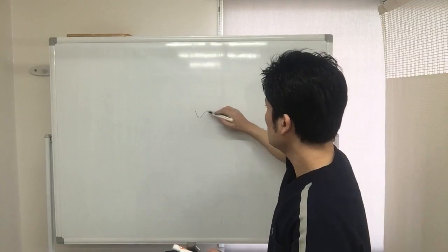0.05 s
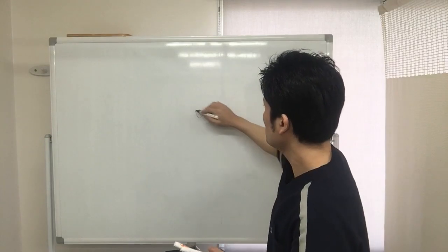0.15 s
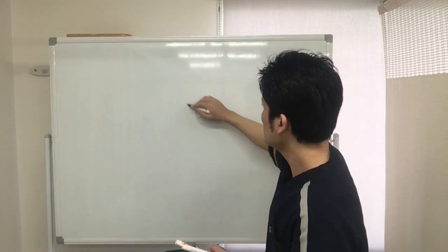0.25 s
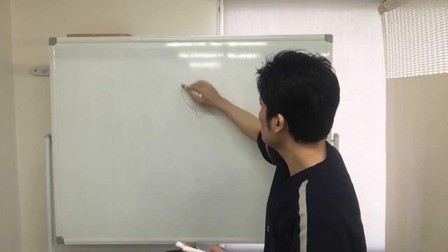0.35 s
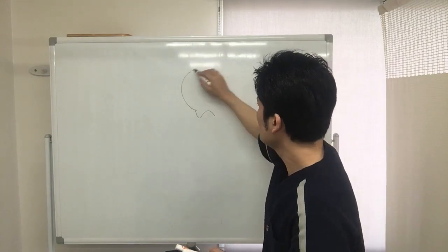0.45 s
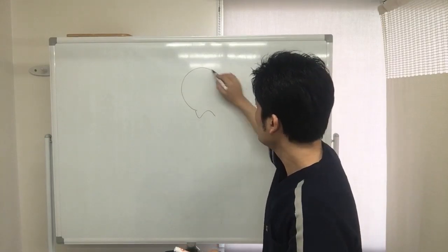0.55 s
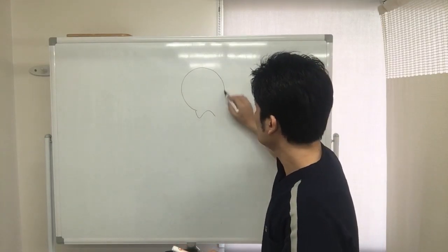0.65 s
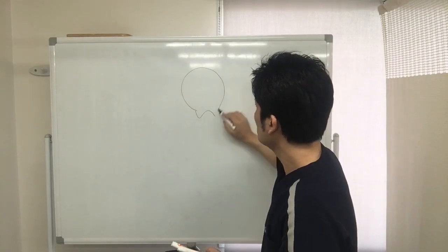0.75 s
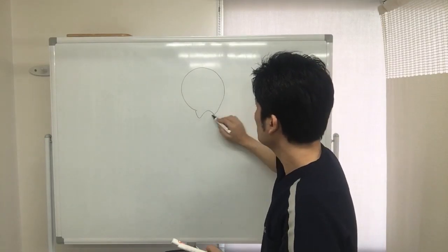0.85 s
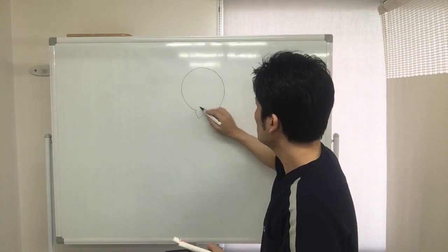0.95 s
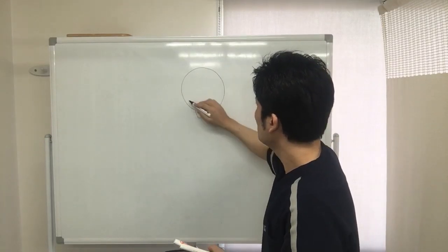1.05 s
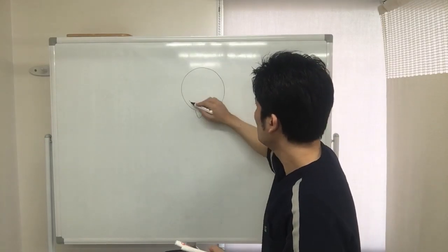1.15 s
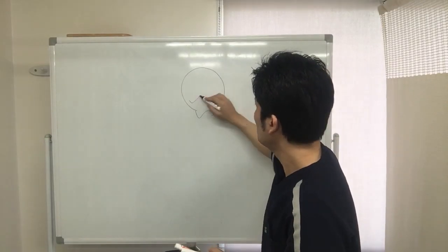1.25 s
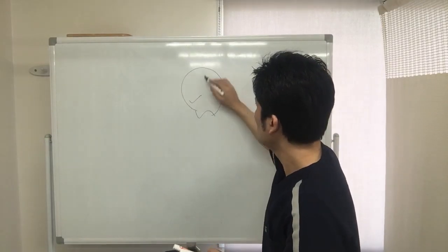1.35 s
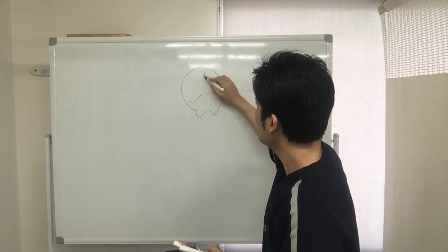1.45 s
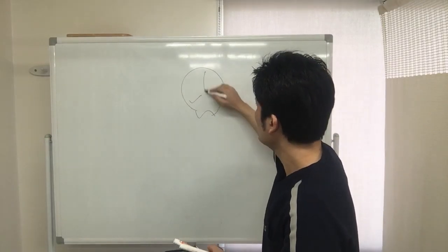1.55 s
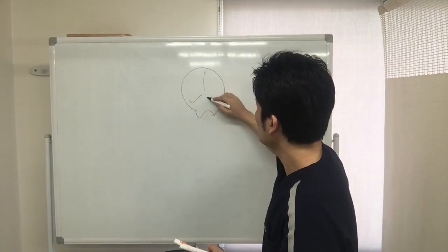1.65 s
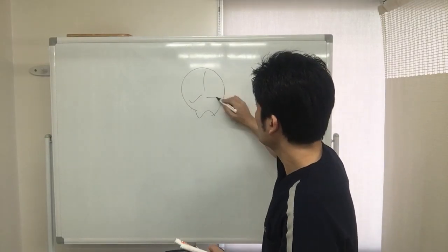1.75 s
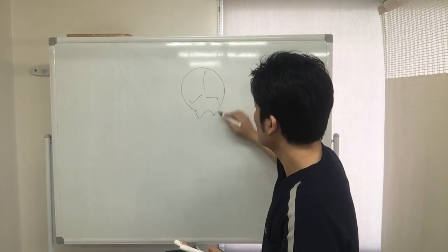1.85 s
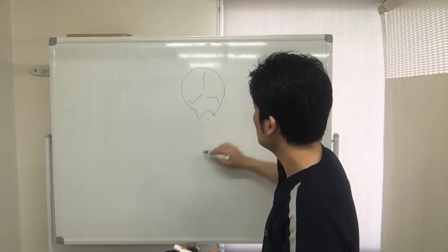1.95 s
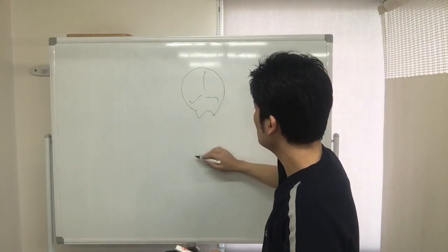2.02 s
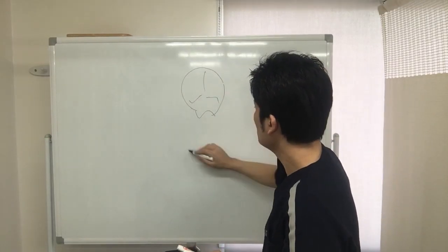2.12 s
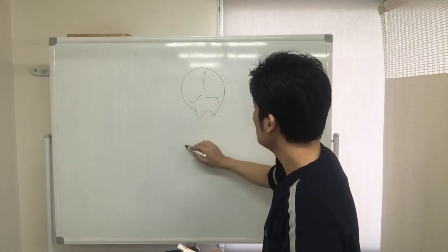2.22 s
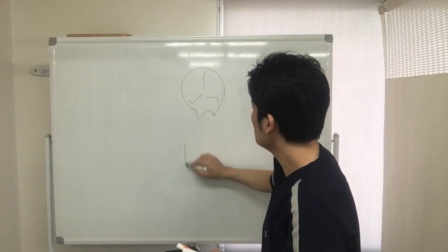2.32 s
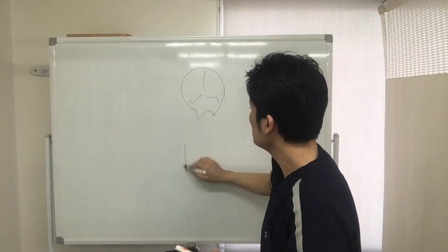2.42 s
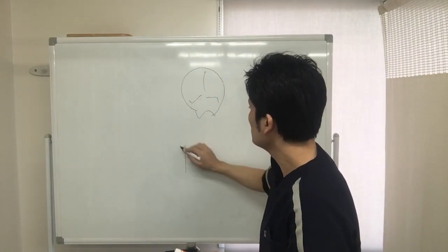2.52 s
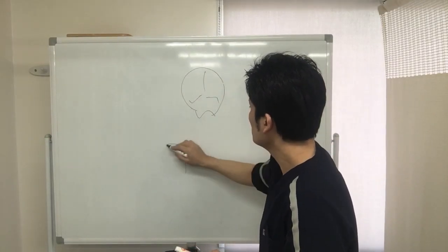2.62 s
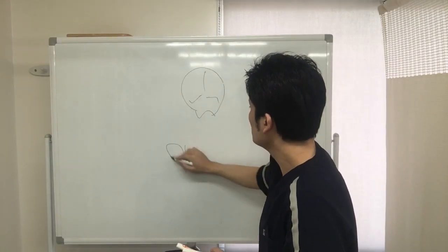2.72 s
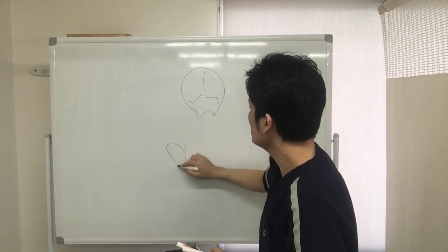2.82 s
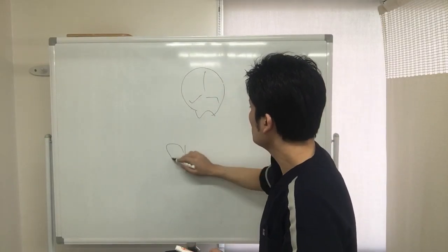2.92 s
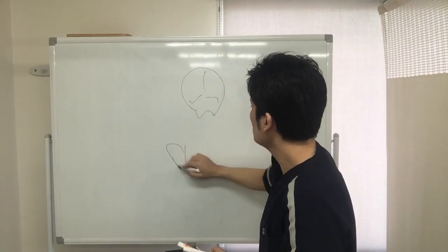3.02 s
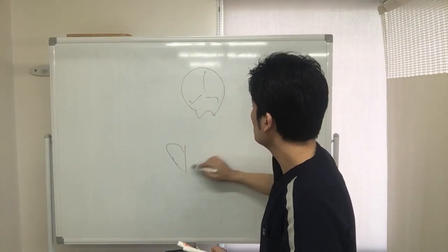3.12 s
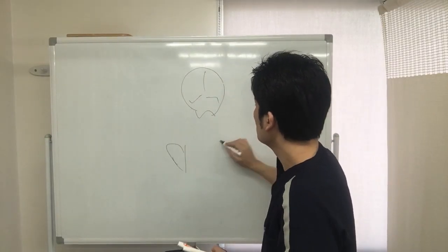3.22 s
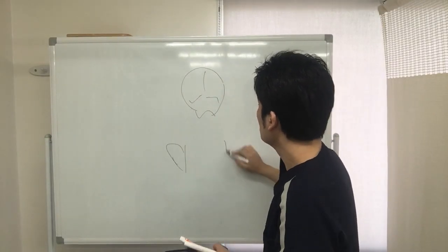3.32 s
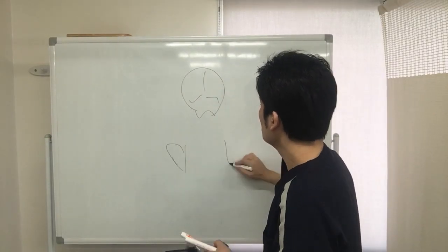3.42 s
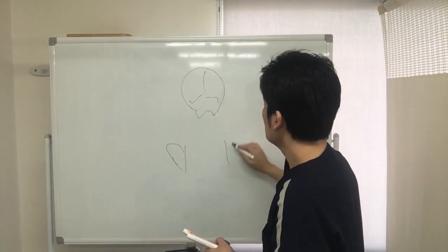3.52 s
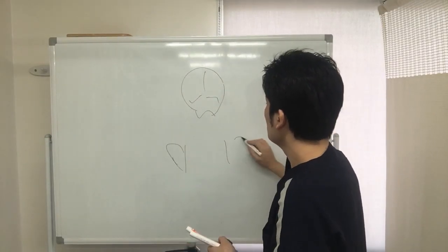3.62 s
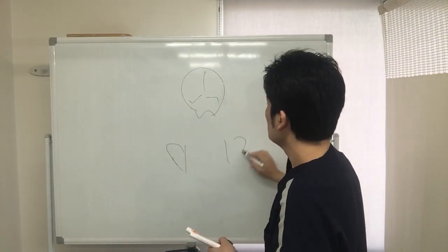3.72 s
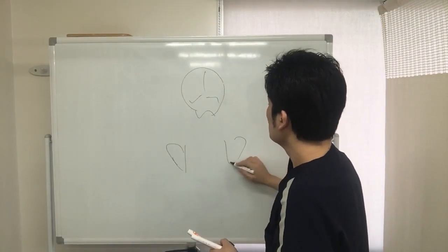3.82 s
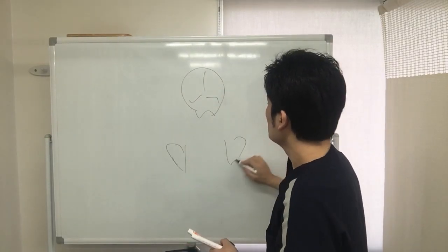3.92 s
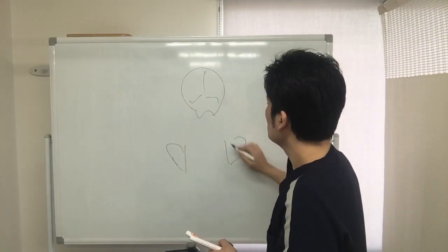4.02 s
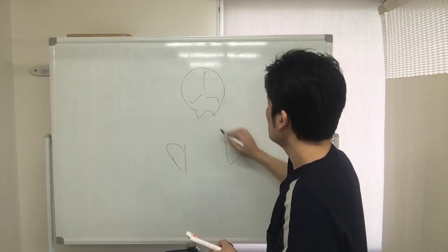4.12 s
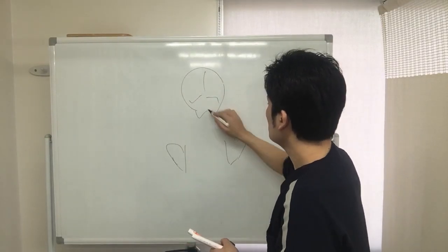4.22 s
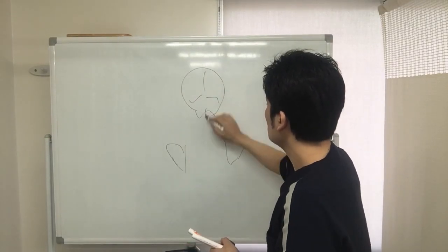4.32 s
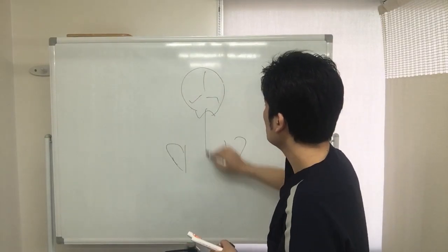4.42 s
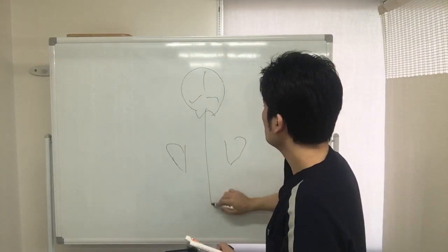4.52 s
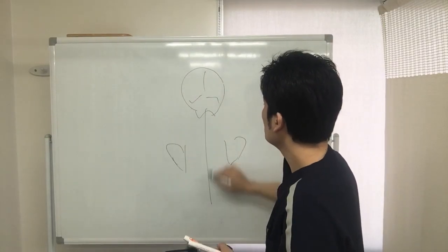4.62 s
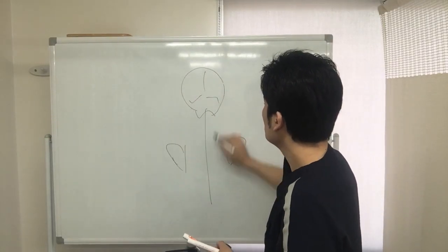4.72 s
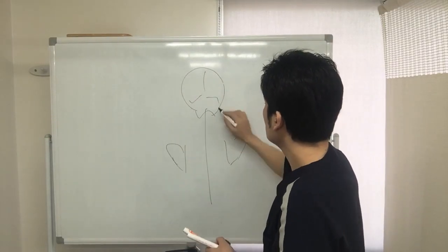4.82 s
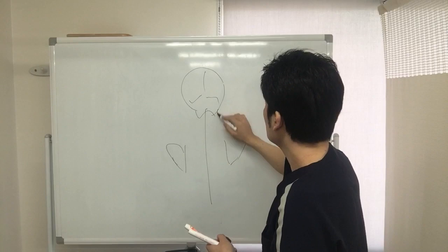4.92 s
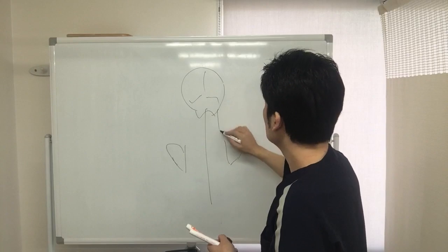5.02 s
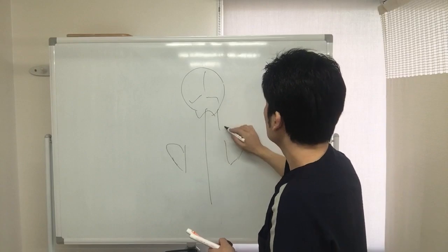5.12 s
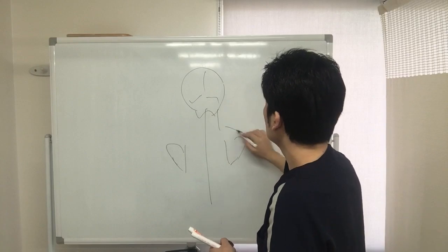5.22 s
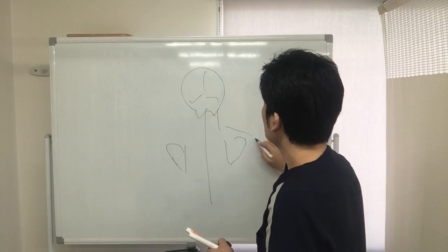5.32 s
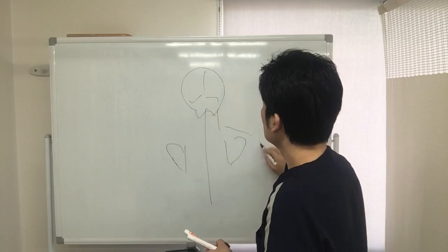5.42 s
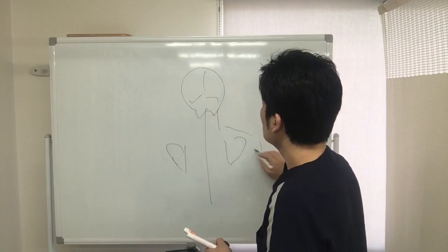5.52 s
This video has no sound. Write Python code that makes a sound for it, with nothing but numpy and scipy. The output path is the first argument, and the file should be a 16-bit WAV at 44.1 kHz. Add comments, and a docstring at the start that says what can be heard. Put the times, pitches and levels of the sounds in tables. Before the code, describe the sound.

A quiet small room with steady low mains hum, soft ventilation rumble and very faint whines. At 0.2 s a felt marker lands on a whiteboard with a firm hollow thump, a tick and a squeak, then hisses softly along a curve until about 0.85, slowing to a dull rub until 1.0. Lighter taps at 1.1, 1.45 and 1.6 carry short strokes; those at 1.85 and 2.1 are barely audible. Taps at 2.2, 2.5 and 2.95 get firmer, with short swishes and a squeak at 2.9. A quick bright swish follows the tap at 3.3; strong knocks at 3.6 and 3.9 come with slow, dull rubs and small squeaks. The hard tap at 4.3 starts a longer hissing line to 4.6. Firm knocks at 4.9 and 5.2 bring short strokes and a squeak at 5.1, then a softer tap at 5.4. Board resonances die quickly, with a close wall reflection and short room tail.

```python
"""A felt marker draws on a free-standing whiteboard in a small room, a wall close behind the board.
Each touch-down thumps the panel, which rings differently high up and lower down; firm, hard landings
also tick in the barrel. Each line is one swing of the hand: filtered noise rubs dully when slow and
hisses when fast. Short wavering tones with rough noise squeak now and then.
Mains hum, faint whines and ventilation noise lie beneath."""
import sys
import numpy as np
from scipy import signal
from scipy.fft import rfft, irfft
from scipy.io import wavfile

SR = 44100
rng = np.random.default_rng(int(sys.argv[2]) if len(sys.argv) > 2 else 0)


def bounce(signal):
    """Save signal as a 16-bit WAV file at the path given by the first command-line argument."""
    frames = np.transpose(np.atleast_2d(signal))
    limited = np.clip(frames, -1, 1)
    pcm = np.round(limited * 32767).astype(np.int16)
    wavfile.write(sys.argv[1], SR, pcm)


N = 245195  # samples, about 5.56 s


def amp(db):
    """Decibels to gain."""
    return 10 ** (np.asarray(db) / 20)


def unit(x):
    """Scales to rms 1."""
    return x / np.sqrt(np.mean(x ** 2) + 1e-20)


def read(points, hz):
    """Reads a table of (frequency [Hz], value) on a log-frequency axis."""
    f, value = np.transpose(points)
    return np.interp(np.log(hz + 1), np.log(f + 1), value)


def add(mix, s, sound):
    """Mixes a sound in at time s, cut off at the ends of the mix."""
    start = round(s * SR)
    sound = sound[max(-start, 0):]
    part = mix[max(start, 0):][:len(sound)]
    part += sound[:len(part)]


def colour(x, points, tilt_db=0):
    """Filters x by a table of relative levels, tilted by some dB per octave, to rms 1."""
    hz = np.fft.rfftfreq(len(x), 1 / SR)
    gain = amp(read(points, hz) + tilt_db * np.log2(hz + 1))
    return unit(irfft(rfft(x) * gain, len(x)))


def band(x, low_hz, high_hz, order=2):
    """Causal band-pass."""
    sections = signal.butter(order, [low_hz, high_hz], "band", fs=SR, output="sos")
    return signal.sosfilt(sections, x)


def drift(size, rate):
    """Smooth random wander of rms 1, its spectrum fading out around rate [Hz]."""
    hz = np.fft.rfftfreq(size, 1 / SR)
    smooth = np.exp(-(hz / rate) ** 2) * (hz > 0)
    return unit(irfft(rfft(rng.standard_normal(size)) * smooth, size))


def die_away(x, t60):
    """Lets each frequency of x decay at its own speed."""
    hz, t, z = signal.stft(x, SR, nperseg=256)
    decay = amp(-60 * t / read(t60, hz)[:, None])
    return signal.istft(z * decay, SR)[1][:len(x)]


def background(waver_db=0.8, wander_rad=0.39):
    """Hum and whines as sines of slightly wavering level and phase; ventilation as two filtered noises."""
    # mains and fan hum, faint whines: (frequency [Hz], mean level [dB])
    hum_lines = [(97.5, -72.5), (119.9, -58.5), (651, -88), (3400, -88.5), (3764, -108)]
    # low ventilation rumble: (frequency [Hz], relative level [dB per Hz])
    rumble_spectrum = [(12, -38), (27, -11), (39, 5), (52, -4.5), (80, -2), (100, -3.5), (135, -1),
                       (175, -5), (250, -10), (350, -32.5), (600, -42), (2000, -82)]
    # thin ventilation hiss: (frequency [Hz], relative level [dB per Hz])
    hiss_spectrum = [(210, -15.5), (350, 2.5), (437, -9), (537, -4.5), (600, -5), (798, -6.5), (892, -6.5),
                     (1050, -6), (2710, -10), (2980, -10), (5530, -16), (6180, -15), (7960, -21.5),
                     (9480, -22), (15500, -32.5)]
    rumble_db, hiss_db = -58.5, -67
    t = np.arange(N) / SR
    hum = np.zeros(N)
    for hz, db in hum_lines:
        level = amp(db + waver_db * drift(N, 1.5))
        hum += level * unit(np.sin(2 * np.pi * hz * t + wander_rad * drift(N, 14)))
    rumble = amp(rumble_db) * colour(rng.standard_normal(N), rumble_spectrum)
    hiss = amp(hiss_db) * colour(rng.standard_normal(N), hiss_spectrum)
    return hum + rumble + hiss


def echo(x, db, wall_s=.0051):
    """The wall just behind the board answers once."""
    out = x.copy()
    add(out, wall_s, amp(db) * x)
    return out


def room(x, wall_db, wet_db, build_s=0.0026):
    """The wall's echo, plus a short diffuse tail of decaying noise."""
    # reverberation of the small room: (frequency [Hz], decay time t60 [s])
    tail_t60 = [(150, 0.28), (500, 0.26), (1500, 0.28), (4000, 0.2), (10000, 0.26)]
    t = np.arange(SR // 2) / SR
    tail = die_away(rng.standard_normal(len(t)), tail_t60) * (1 - np.exp(-t / build_s))
    tail /= np.linalg.norm(tail)
    return echo(x, wall_db) + amp(wet_db) * signal.fftconvolve(x, tail)[:len(x)]


def squeaks(waver=0.05, waver_rate=500, flutter_db=3, tone_db=-5, scrape_db=-3, linger_db=-13, linger_s=0.15):
    """The tip sticks and slips near the barrel's resonance: a quick burst, then a faint lingering chatter."""
    # squeaks of the tip: (start [s], level before the room [dB], mean pitch [Hz])
    squeak_list = [(0.172, -54, 3600), (1.401, -61.5, 3450), (1.595, -66, 3550), (1.808, -70, 3380),
                   (2.080, -67.5, 3550), (2.923, -58.5, 3680), (3.635, -60.5, 3540), (3.775, -62, 3620),
                   (4.171, -68, 3630), (5.105, -60.5, 3730)]
    # rough part of a squeak, centred on the barrel's resonance: (frequency [Hz], relative level [dB per Hz])
    scrape_spectrum = [(300, -28), (1400, -13.5), (2600, -18), (3100, -9), (3550, 3.5), (4200, -6.5),
                       (4900, -13), (6200, -24), (7300, -11.5), (8500, -37), (16000, -50)]
    rise_s = 0.0091
    out, t = np.zeros(N), np.arange(SR // 4) / SR
    rise = t / rise_s
    burst = (rise * np.exp(1 - rise)) ** 2
    linger = amp(linger_db) * np.minimum(rise, 1) * np.exp(-t / linger_s)
    grip = burst + linger
    for s, db, hz in squeak_list:
        pitch = hz * (1 + waver * drift(len(t), waver_rate))
        tone = unit(np.sin(2 * np.pi * np.cumsum(pitch) / SR))
        scrape = colour(rng.standard_normal(len(t)), scrape_spectrum)
        chatter = unit(amp(flutter_db * np.tanh(drift(len(t), 300))))
        add(out, s, amp(db) * grip * chatter * (amp(tone_db) * tone + amp(scrape_db) * scrape))
    return out


def swing(size, peak_share=0.34):
    """Speed of the hand along one line, 0 to 1: it gathers pace, peaks after peak_share and slows to a stop."""
    angle = np.interp(np.linspace(0, 1, size), [0, peak_share, 1], [0, np.pi / 2, np.pi])
    return np.sin(angle)


def rubbing(grain_db=2.0, grain_rate=250, uneven_db=2.5, uneven_rate=25):
    """Felt fibres catch and slip: a dull rub that hardly follows speed, and a bright swish that grows with it."""
    # swings of the hand: (start [s], length [s], relative top speed [dB], pressure as added level [dB])
    stroke_list = [(0.191, .66, 1.5, -1.5), (0.761, .27, -21, 7), (1.17, 0.14, -1, -4.5),
                   (1.49, 0.26, -5.5, 1.5), (1.765, .13, -13, 5.5), (1.993, 0.16, -7, 1),
                   (2.282, .12, 4.5, -3.5), (2.528, 0.14, -4, -1.5), (2.727, .10, -1, -1),
                   (2.998, 0.063, 7, -5), (3.332, .09, 10.5, -7.5), (3.599, 0.18, -19, 4.5),
                   (3.942, .15, -21, 5.5), (4.339, 0.26, 4, -2), (4.944, 0.085, 2, -2.5),
                   (5.192, 0.13, 0.5, -1.5)]
    # felt on enamel with the marker's resonances, before tilt: (frequency [Hz], relative level [dB per Hz])
    felt_spectrum = [(100, -49), (300, -13), (800, -8.5), (1400, 4.5), (2300, -0.5), (3650, 3.5), (4800, 3),
                     (5600, 0.5), (6050, 3), (6550, -6.5), (7250, -0.5), (8300, -11.5), (11000, -22),
                     (16000, -28)]
    # level [dB], tilt [dB per octave], power of the speed that the level follows
    rub_db, rub_tilt_db, rub_power = -75.5, -6, 0.1
    swish_db, swish_tilt_db, swish_power = -72.5, 6, 0.87
    out = np.zeros(N)
    for start, length, speed_db, pressure_db in stroke_list:
        size = round(length * SR)
        speed = amp(speed_db) * swing(size)
        roughness_db = grain_db * drift(size, grain_rate) + uneven_db * drift(size, uneven_rate)
        slips = rng.standard_normal(size) * amp(roughness_db)
        rub = colour(slips, felt_spectrum, rub_tilt_db)
        swish = band(colour(slips, felt_spectrum, swish_tilt_db), 1500, 10000)
        add(out, start, amp(rub_db + pressure_db) * speed ** rub_power * rub)
        add(out, start, amp(swish_db + pressure_db) * speed ** swish_power * swish)
    return out


def ring(t, hz, db, t60):
    """One struck mode: a sine that decays by 60 dB in t60 [s]."""
    return amp(db) * np.exp(-np.log(1000) * t / t60) * np.sin(2 * np.pi * hz * t)


def harden(x, tilt_db, knee_hz=330, top_hz=5000):
    """A harder, shorter contact lifts the sound from knee to top, a softer one dulls it; minimum phase."""
    hz = abs(np.fft.fftfreq(len(x), 1 / SR))
    octaves = np.log2(np.hypot(1, hz / knee_hz) / np.hypot(1, hz / top_hz))
    log_gain = np.log(amp(tilt_db * octaves))
    # the Hilbert transform of the log gain gives the phase of a causal filter
    return np.fft.ifft(np.fft.fft(x) * np.exp(np.conj(signal.hilbert(log_gain)))).real


def taps(panel_db=-42, swell_s=0.011, spread_s=0.00079, lag_s=0.00094):
    """The tip lands: the barrel ticks, the panel gives, bending waves spread and the low modes build up."""
    # touch-downs: (time [s], force [dB], hardness [dB per octave], place [0 high on the board to 1 lower down])
    tap_list = [(0.2013, -0.5, 0, 0.29), (1.115, -5, 1, 0.065), (1.4463, -5.5, 4, 0.33),
                (1.605, -11.5, -12.5, 0.076), (1.847, -27.5, 5.5, 0.5), (2.130, -31.5, 6.5, .6),
                (2.231, -8.5, -3, 0.81), (2.4919, -1.5, -2, 0.63), (2.950, -2, -1, 0.48),
                (3.3026, -3, -1.5, 0.67), (3.568, 1, 0, 0.82), (3.9061, 1, -0.5, 0.56),
                (4.271, 1.5, 0.46, 0.28), (4.888, 1.5, 0, 0.31), (5.172, -1, 0, 0.58),
                (5.402, -6, -3, 0.56)]
    # ringing of the board, before force and hardness:
    # (frequency [Hz], level struck high [dB], level struck lower [dB], decay time t60 [s])
    board_modes = [(98.26, -46, -47.5, 1.54), (136.6, -80, -55.5, 0.98), (163.9, -46, -42, 0.44),
                   (188.8, -36.5, -41.5, 0.24), (208, -58.5, -37.5, 0.29), (235.1, -34.5, -54, 0.37),
                   (256, -45, -44, 0.3), (283.5, -53.5, -41, 0.25), (301, -41, -57.5, 0.41),
                   (315.5, -50, -71, 0.26), (339, -49, -54.5, 0.33), (366.7, -43.5, -39, 0.2),
                   (382.9, -48, -49, 0.24), (427.6, -58, -49.5, 0.26), (443.7, -58, -41, 0.14),
                   (479.5, -36, -71, 0.091), (531, -46.5, -44.5, 0.14), (555, -47, -52, 0.11),
                   (643, -50, -58, 0.26), (662, -57, -61, 0.22), (696, -40, -70, 0.17),
                   (720, -44, -64, 0.085)]
    # first give of the panel under the tip as wave packets, before force and hardness:
    # (frequency [Hz], level struck high [dB], level struck lower [dB], length [s])
    thump_packets = [(217, -35, -33.5, 0.0132), (355.7, -50.5, -37, 0.015), (680.4, -37.5, -54.5, 0.014),
                     (1060, -44.5, -72, 0.0082)]
    # the plastic barrel, before the band-pass and tick level: (frequency [Hz], level [dB], decay time t60 [s])
    barrel_modes = [(3484, -43.5, 0.0057), (5560, -42, 0.0019), (7940, -49, 0.00074)]
    # dense bending waves of the panel: (frequency [Hz], relative level [dB per Hz])
    panel_spectrum = [(100, -31), (400, 2), (750, -3), (1100, -5.5), (1700, -2.5), (2400, -12.5),
                      (3500, -7.5), (4700, -18), (6200, -20.5), (8000, -40), (12000, -46), (16000, -53)]
    # their decay: (frequency [Hz], decay time t60 [s])
    panel_decay = [(300, 0.22), (1000, 0.075), (3500, 0.026), (9000, 0.072)]
    # the tick grows with force (dB per dB) and hardness (dB per dB per octave)
    tick_base_db, tick_per_force, tick_per_hardness = 4, 1.96, 1.6
    out, t = np.zeros(N), np.arange(SR) / SR
    travel = rng.random(len(board_modes))  # each mode reaches the microphone at its own point in the cycle
    tick = sum((-1) ** k * ring(t, *mode) for k, mode in enumerate(barrel_modes))
    tick = band(tick, 2370, 8600, order=4)
    for s, force_db, hardness_db, place in tap_list:
        thump = np.zeros(SR)
        for k, (hz, high_db, low_db, length) in enumerate(thump_packets):
            level = (-1) ** k * amp(high_db + place * (low_db - high_db))  # neighbours swing opposite ways
            packet = np.sin(np.pi * np.minimum(t / length, 1)) ** 2
            # the felt cushions the push, so the wave inside the packet comes a little late
            thump += level * packet * np.sin(2 * np.pi * hz * (t - lag_s))

        waves = die_away(colour(rng.standard_normal(SR), panel_spectrum), panel_decay)  # new at every landing
        waves = band(waves * amp(panel_db) * (1 - np.exp(-t / spread_s)), 180, 10000)

        modes = np.zeros(SR)
        for k, (hz, high_db, low_db, t60) in enumerate(board_modes):
            modes += ring(t + travel[k] / hz, hz, high_db + place * (low_db - high_db), t60)
        modes *= 1 - np.exp(-t / swell_s)

        panel = thump + modes + room(waves, wall_db=-17, wet_db=-6.5)
        board = amp(force_db) * harden(panel, hardness_db)
        tick_db = tick_base_db + tick_per_force * force_db + tick_per_hardness * hardness_db
        add(out, s, board + amp(tick_db) * room(tick, wall_db=-7.0, wet_db=-5.5))
    return out


def scene():
    """Taps and drawing sounds over the room's background, as one channel."""
    drawing = room(rubbing() + squeaks(), wall_db=-17.5, wet_db=-6.5)
    return (background() + drawing + taps())[None]


def record(dry):
    """The microphone's port cuts narrow dips in the treble; then the recorder's band limit."""
    # dips of the port: (centre [Hz], distance from centre where the dip falls to 1/e [Hz], depth [dB])
    port_dips = [(4940, 190, -4.5), (8430, 350, -2), (10550, 620, -4.5)]
    edge_hz = 15800
    hz = np.fft.rfftfreq(N, 1 / SR)
    port_db = sum(db * np.exp(-((hz - centre) / width) ** 2) for centre, width, db in port_dips)
    heard = irfft(rfft(dry) * amp(port_db), N)
    low_pass = signal.firwin(511, edge_hz, window=("kaiser", 9), fs=SR)
    return signal.oaconvolve(heard, low_pass[None], "same")


dry = scene()
out = record(dry)
bounce(out)
```